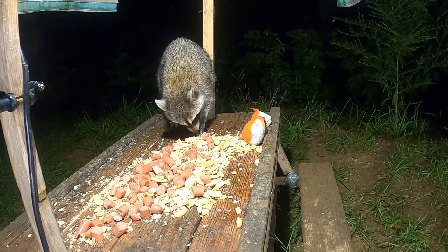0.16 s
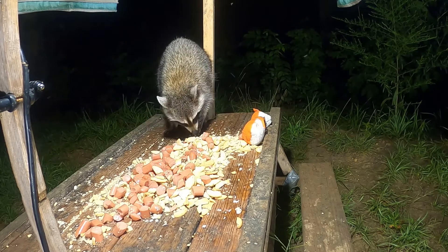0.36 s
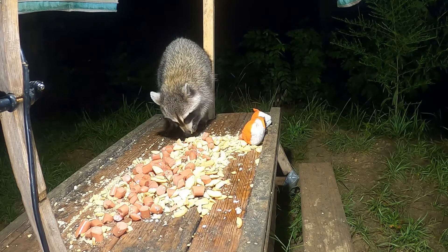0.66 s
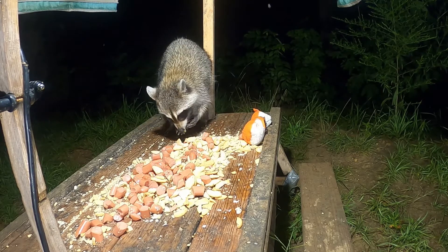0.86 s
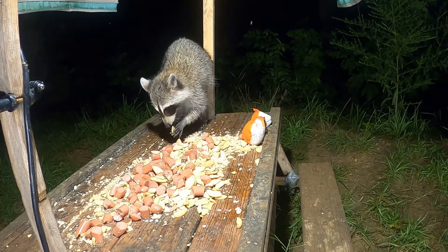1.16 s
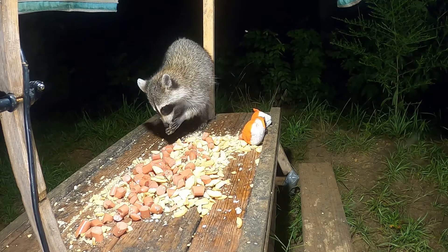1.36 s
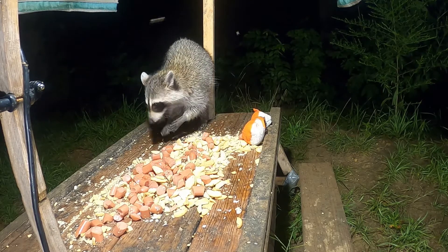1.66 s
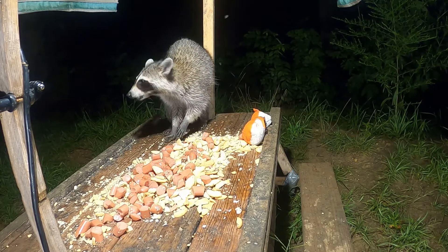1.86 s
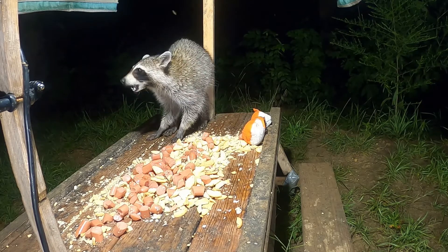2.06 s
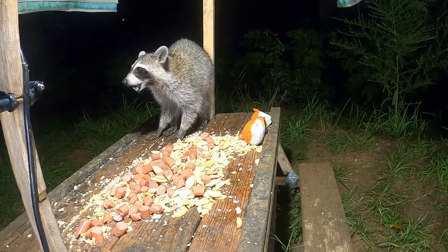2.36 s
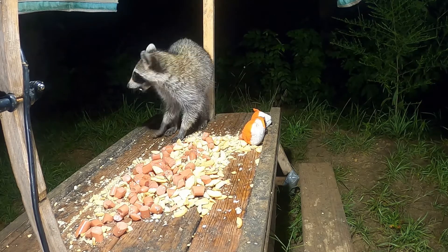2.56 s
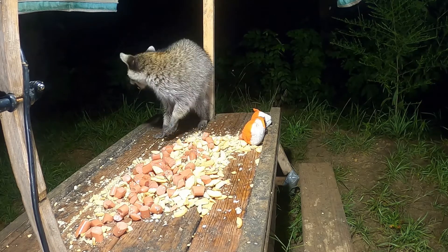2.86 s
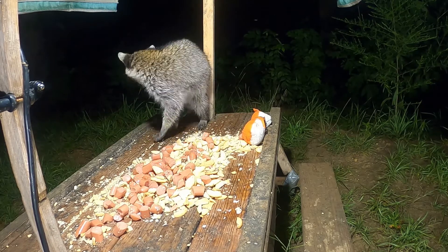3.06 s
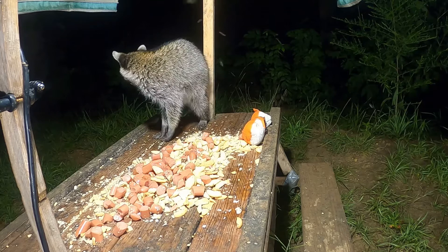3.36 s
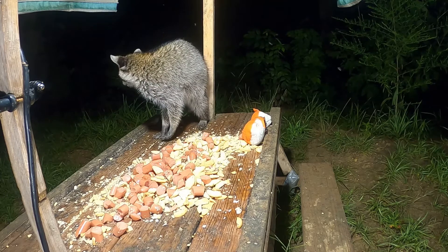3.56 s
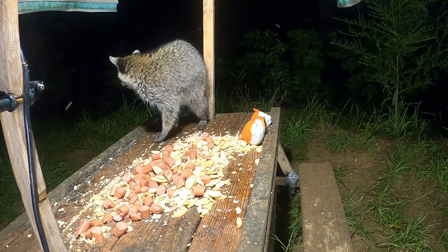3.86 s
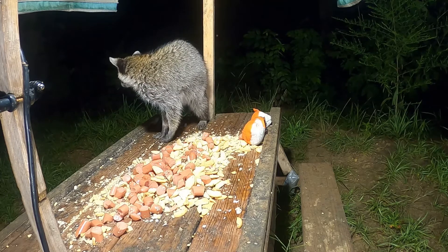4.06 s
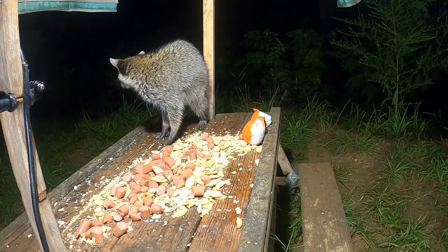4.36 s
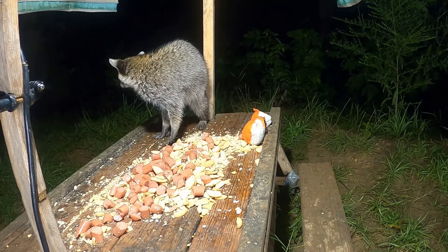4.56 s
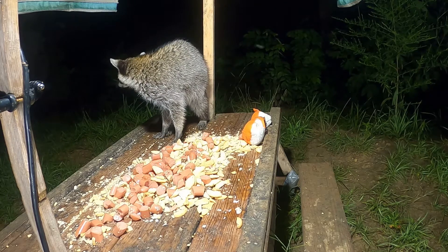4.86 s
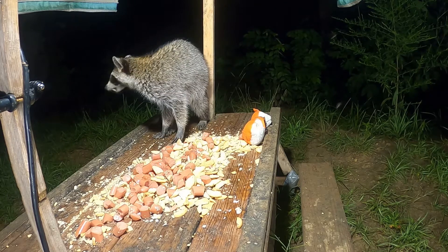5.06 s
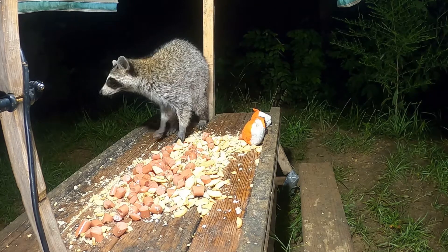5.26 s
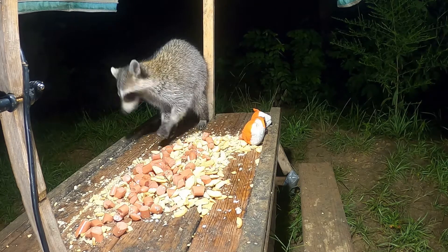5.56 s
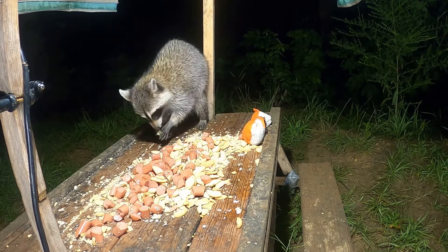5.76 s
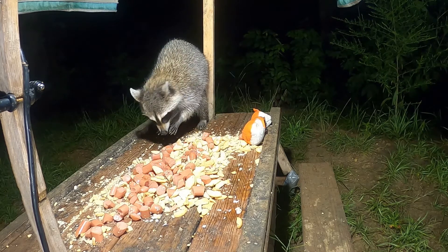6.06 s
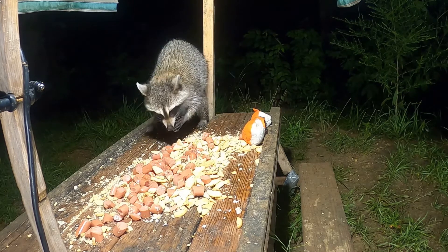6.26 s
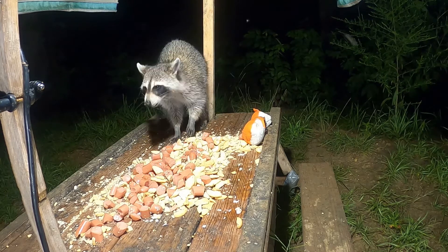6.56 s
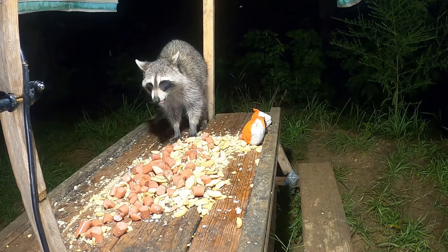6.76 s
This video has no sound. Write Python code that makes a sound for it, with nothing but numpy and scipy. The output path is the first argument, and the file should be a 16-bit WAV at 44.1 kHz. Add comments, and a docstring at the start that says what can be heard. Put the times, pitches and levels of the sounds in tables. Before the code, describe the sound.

A continuous wide insect chorus dominates: mid-high trilling, pulsing raspy chirrs and a thin treble sizzle, over very faint air and lumpy low rumble. A small animal feeding on a plank table adds sparse muffled taps, dull pips and scuffs around two to three seconds, then little until soft thumps and knocks gather in the last second and a half. Small stereo microphone near the table, open yard, no echo.

```python
"""A summer night in a wooded yard, heard from a wooden feeding table.
Throughout, low and treble air flicker, the table rumbles, choirs of gated sines trill as crickets,
and random file teeth ring wing modes as bush crickets, rasping in throbs. Soft pips sound from the start;
a high buzz begins its long phrases at 0.4 s, and a faint sizzle flares and thuds ring from 0.6 s.
From 2 s a small animal's scuffing contacts knock the planks into resonance."""
import sys
import numpy as np
from scipy import signal
from scipy.io import wavfile

SR = 44100
rng = np.random.default_rng(int(sys.argv[2]) if len(sys.argv) > 2 else 0)


def wav_out(sig):
    """Save sig, one row per channel (or a flat mono array), as 16-bit PCM at SR to the path in sys.argv[1]."""
    wavfile.write(sys.argv[1], SR, np.round(np.clip(np.atleast_2d(sig).T, -1, 1) * 32767).astype(np.int16))


def boost_factor(decibels):
    """Convert a level in decibels to a linear amplitude factor."""
    exponent = np.asarray(decibels, float) / 20
    return 10 ** exponent


N = 304731


def rms_one(x):
    """Normalization: scale to unit mean power."""
    return x / np.sqrt(np.mean(x ** 2) + 1e-20)


def at_hz(points, hz):
    """Interpolation of a spectrum on a logarithmic frequency axis."""
    return np.interp(np.log(hz), np.log(np.array(points)[:, 0]), np.array(points)[:, 1])


def drift(corner_hz, step=1):
    """Low-passed noise: two equal poles leave a slow chance of rms 1, read at every step-th sample."""
    r = np.exp(-80 * np.pi * corner_hz / SR)     # the noise is drawn once in 40 samples
    slow = signal.lfilter([1], [1, -2 * r, r * r], rng.standard_normal(N // 40 + 2002))[2000:]
    return np.interp(np.arange(0, N, step) / 40, np.arange(len(slow)), rms_one(slow))


def left_right(pan_db):
    """Interaural level difference: half is added at the left and half taken at the right, in dB."""
    return np.array([[pan_db / 2], [-pan_db / 2]])


def place(near, other, alike, lag_s, pan_db):
    """Interaural coherence: a shared part that arrives late on the left, and an unshared part."""
    alike = np.clip(alike, 0, 1)
    late = np.interp(np.arange(N) - lag_s * SR, np.arange(N), near)
    shared = np.sqrt(alike) * np.array([late, near])
    unshared = np.sqrt(1 - alike) * other
    return (shared + unshared) * boost_factor(left_right(pan_db))


def air(spectrum, low_hz, high_hz, patchy_db, lean):
    """Band-filtered noise: half-octave bands, each with its own flicker, coherence and side."""
    # likeness of the two ears: hz, correlation
    likeness = [(50, 0.96), (100, 0.34), (200, 0.26), (500, 0.07)]
    # level difference of the ears, scaled by lean: hz, left_over_right_db
    leaning = [(60, 0), (150, -2.5), (400, -7), (900, -6.5)]
    out = 0
    edges = low_hz * 2 ** np.arange(0, np.log2(high_hz / low_hz), 1 / 2)
    white = rng.standard_normal((2, 2, N + SR // 4))
    for k, (low, high) in enumerate(zip(edges, edges[1:])):
        band = signal.butter(2, [low, high], "band", fs=SR, output="sos")
        mid, side = signal.sosfilt(band, white[k % 2])[:, SR // 4:]     # without the filter's onset
        hz = np.sqrt(low * high)
        alike = np.clip(at_hz(likeness, hz), -1, 1)
        pan_db = lean * at_hz(leaning, hz)
        flicker = np.repeat(boost_factor(patchy_db * drift(6.4, step=8)), 8)[:N]
        gain = boost_factor(at_hz(spectrum, hz) + left_right(pan_db)) * flicker
        out = out + gain * (np.sqrt(1 + alike) * mid + np.sqrt(1 - alike) * side * [[1], [-1]])
    return rms_one(out)


def night_air():
    """Broadband noise: a low bed and a treble bed, each set to its own rms level."""
    # relative spectral density of the low air: hz, density_db_per_hz
    low_spectrum = [(74, -33), (125, -1.5), (161, -0.5), (216, -3), (328, -10.5), (603, -17), (786, -8.5),
                    (951, -19.5), (1100, -4), (1430, -31), (2420, -120)]
    # relative spectral density of the treble air: hz, density_db_per_hz
    treble_spectrum = [(1000, -29), (1600, 8), (6500, -10.5), (8200, -13), (9000, -16), (13000, -11),
                       (14300, -13), (15500, -30)]
    low = boost_factor(-67.5) * air(low_spectrum, 133.2, 1500, patchy_db=2.96, lean=0.8)
    treble = boost_factor(-60.5) * air(treble_spectrum, 1023, 17000, patchy_db=3.3, lean=0.28)
    return low + treble


def table_rumble():
    """Amplitude modulation of low-frequency noise: a lumpy rumble in the table."""
    # course of the rumble before its random waver: time_s, level_db
    level_rows = [(0.0, -71), (0.4, -76.5), (1.05, -70.5), (1.5, -79.5), (2.3, -68.5), (2.7, -76.5),
                  (3.8, -77), (4.7, -66.5), (5.4, -78), (6.91, -70)]
    # relative spectral density: hz, density_db_per_hz
    colour = [(18, -11), (30, 1.5), (45, -0.5), (90, -1.5), (112, -16), (140, -33)]
    s, db = np.transpose(level_rows)
    level_db = np.interp(np.arange(N) / SR, s, db) + 5.4 * drift(2.4)
    return boost_factor(level_db) * air(colour, 17.9, 150, patchy_db=1.9, lean=1)


def crickets():
    """Amplitude modulation: near sines cut into wing strokes that sag in pitch; singers swell and wander."""
    # choirs: lowest_hz, highest_hz, mean_strokes_per_s, level_db, left_over_right_db
    choir_rows = [(2126, 2280, 57, -48, 3.5), (2340, 2480, 65, -47.5, 6.5), (2890, 3090, 62, -50, 4)]
    singers, step = 21, 4     # per choir; tones are drawn at a quarter of the rate
    sag, gate_depth = 0.021, 0.92     # fraction of pitch lost over a stroke; depth of the cut
    swell_db, choir_waver_db = 3.0, 0.03     # rms swing of one singer and of a whole choir
    out = 0
    for low_hz, high_hz, strokes, level_db, pan_db in choir_rows:
        groups = np.zeros((3, len(range(0, N, step))))     # singers ahead, far left and far right
        for k, hz in enumerate(np.linspace(low_hz, high_hz, singers)):
            pace = strokes * rng.uniform(.93, 1.07) * (1 + .02 * drift(3.02, step=step))
            stroke = (rng.random() + np.cumsum(pace) * step / SR) % 1
            pitch_hz = hz * (1 + sag * (.5 - stroke) + .008 * drift(3.5, step=step))
            gate = 1 - gate_depth * np.cos(np.pi * stroke) ** 2
            tone = np.sin(2 * np.pi * (np.cumsum(pitch_hz) * step / SR + rng.random()))
            groups[k % 3] += boost_factor(swell_db * drift(12.6, step=step)) * gate * tone
        groups = rms_one(signal.resample_poly(groups, step, 1, axis=1)[:, :N])
        level = boost_factor(level_db + choir_waver_db * drift(2.5))
        out = out + level * place(groups[0], groups[1:], 0.68, 4e-5, pan_db)
    return out


def wings(modes, teeth_per_s, uneven_db):
    """Modal excitation: three crowds of random file teeth, each click ringing the wing modes."""
    born = rng.random((3, N)) < teeth_per_s / SR
    strength = boost_factor(uneven_db * np.minimum(rng.exponential(1, born.sum()), 4))
    clicks, out = np.zeros((3, N)), 0
    clicks[born] = strength * rng.choice([-1, 1], born.sum())
    for k, (hz, width_hz, level_db) in enumerate(modes):
        r = np.exp(-np.pi * width_hz / SR)
        stage = [(1 - r * r) / 2, 0, (r * r - 1) / 2, 1, -2 * r * np.cos(2 * np.pi * hz / SR), r * r]
        ringing = signal.sosfilt([stage, stage], clicks)     # applied twice for steep skirts
        out = out + (-1) ** k * boost_factor(level_db) * ringing
    return rms_one(out)


def bumps(times, levels_db, half_s, between_db):
    """Addition of incoherent powers: bell-shaped swells over a steady level; in dB."""
    t = np.arange(0, N, 64) / SR
    bell = np.exp(-((t - np.array(times)[:, None]) / half_s) ** 2 / 2)
    power = boost_factor(between_db) ** 2 + boost_factor(np.array(levels_db)) ** 2 @ bell
    return np.interp(np.arange(N) / SR, t, 10 * np.log10(power))


def crowd(modes, teeth_per_s, level_db, alike, lag_s, pan_db, flutter_db):
    """Stridulation: a crowd of rubbed wings at a fluttering level, spread between the ears."""
    voices = wings(modes, teeth_per_s, uneven_db=1.5)
    level = boost_factor(level_db + flutter_db * drift(22.0))
    return level * place(voices[0], voices[1:], alike, lag_s, pan_db)


def throbbing_raspers():
    """Pulsed stridulation: two sets of wing modes throb five or six times a second."""
    # rasped syllables, above the steady level: middle_s, upper_level_db, lower_level_db
    throb_rows = [(0.05, -45.5, -50.5), (0.24, -47.5, -58), (0.33, -45, -47), (0.56, -44.5, -49.5),
                  (0.98, -45, -51), (1.19, -42.5, -50), (1.3, -48, -53), (1.5, -48.5, -52),
                  (1.72, -45.5, -51.5), (1.89, -46.5, -55), (2.14, -48, -54), (2.32, -45.5, -50.5),
                  (2.46, -54, -55), (2.59, -45.5, -49.5), (2.77, -44, -47), (2.93, -48.5, -51),
                  (3.14, -51, -52.5), (3.32, -47.5, -51), (3.44, -49.5, -58), (3.63, -45.5, -52),
                  (3.85, -46, -53), (4.05, -46.5, -52), (4.24, -49, -49.5), (4.45, -51, -59),
                  (4.61, -47.5, -51.5), (4.73, -45.5, -49), (4.83, -46, -50), (4.95, -47, -51),
                  (5.23, -52, -72), (5.49, -56, -54.5), (5.6, -46.5, -53.5), (5.72, -47, -49),
                  (5.8, -47.5, -57), (5.91, -48.5, -51.5), (6.02, -49, -54), (6.2, -50.5, -53),
                  (6.38, -48, -51.5), (6.56, -49.5, -51), (6.78, -44.5, -50.5), (6.91, -48.5, -51)]
    # upper wing modes: hz, stage_width_hz, relative_level_db
    upper_modes = [(2673, 553, 2), (3250, 620, -8), (3910, 1030, -5.5), (4404, 640, -3), (4960, 720, -5.5)]
    # lower wing modes: hz, stage_width_hz, relative_level_db
    lower_modes = [(1290, 538, -11.5), (1436, 800, -15), (1887, 226, 3), (2085, 137, 2)]
    s, upper_db, lower_db = np.transpose(throb_rows)
    # half-widths in s; farther raspers fill the gaps between syllables
    upper_level_db = bumps(s, upper_db, half_s=0.045, between_db=-50.5)
    lower_level_db = bumps(s, lower_db, half_s=0.037, between_db=-56.5)
    upper = crowd(upper_modes, 5000, upper_level_db, .3, 3e-5, 3.0, .6)
    lower = crowd(lower_modes, 3000, lower_level_db, .72, 4e-5, 4.5, .6)
    return upper + lower


def far_raspers():
    """Superposition of many teeth: far singers blur into a steady band."""
    # wing modes: hz, stage_width_hz, relative_level_db
    modes = [(4730, 640, -0.5), (5650, 840, 2.5), (6025, 370, 3), (6208, 430, 2.5)]
    return crowd(modes, 9000, -51.5, .1, 3e-5, -.4, .5)


def phrases():
    """Piecewise-linear envelope: each phrase rises, holds and falls away to the pause level; in dB."""
    # phrases, length up to the fall: start_s, length_s, level_db
    phrase_rows = [(0.406, 1.24, -65.5), (2.52, 1.53, -65.5), (4.857, 1.5, -65)]
    rise_s, fall_s, pause_db = 0.15, 0.24, -79.0     # a far buzzer sounds in the pauses
    t, level_db = np.arange(N) / SR, np.full(N, pause_db)
    for s, length_s, db in phrase_rows:
        on = np.interp(t, s + np.array([0, rise_s, length_s, length_s + fall_s]), [0, 1, 1, 0])
        level_db = level_db + (db - pause_db) * on
    return level_db


def buzzer():
    """Modal resonance far up in the treble: a dense rasp in long phrases."""
    # main wing modes: hz, stage_width_hz, relative_level_db
    main_modes = [(8960, 2700, 1), (10390, 1700, 1.7)]
    # top wing mode: hz, stage_width_hz, relative_level_db
    top_mode = [(11900, 3100, 0)]
    level_db = phrases()
    main = crowd(main_modes, 9000, level_db, .05, 5e-5, -2.5, .8)
    top = crowd(top_mode, 9000, level_db - 7, .05, 5e-5, -5.0, 1.2)
    return main + top


def sizzler():
    """Modal resonance just under the buzzer: a faint singer flares up over a steady level."""
    # flares, above the steady level: middle_s, level_db
    flare_rows = [(0.56, -65.5), (1.46, -72), (2.8, -77), (3.6, -69), (5.56, -70), (6.13, -71), (6.69, -74)]
    # wing mode: hz, stage_width_hz, relative_level_db
    modes = [(7800, 1400, 0)]
    level_db = bumps(*np.transpose(flare_rows), half_s=0.078, between_db=-73)
    return crowd(modes, 6000, level_db, .05, 5e-5, -2.4, 1.2)


def blows(rows, rise_s, t60, overtone_db):
    """Damped oscillation: a soft blow swells, rings at its pitch and a weaker overtone, and dies."""
    out, t = np.zeros((2, N + SR)), np.arange(SR // 3) / SR
    for s, peak_db, hz, pan_db in rows:
        shape = (1 - np.exp(-t / rise_s)) ** 2 * boost_factor(-60 * t / t60)
        tone = np.sin(2 * np.pi * hz * t) + boost_factor(overtone_db) * np.sin(2 * np.pi * 1.48 * hz * t)
        at = round(s * SR)
        out[:, at:at + len(t)] += boost_factor(peak_db + left_right(pan_db)) * tone * shape / shape.max()
    return out[:, :N]


def thuds():
    """Low damped oscillation: weight shifts thump the table."""
    # thumps: start_s, envelope_peak_db, pitch_hz, left_over_right_db
    thud_rows = [(0.576, -61.5, 79.5, -4), (1.71, -59, 48.4, 0), (2.257, -69, 78.1, -3),
                 (4.685, -69, 95.5, 2), (4.925, -59, 101, 3), (5.598, -59, 43.4, 6), (5.81, -63, 78.1, -6),
                 (5.899, -59, 57, 2), (5.946, -56, 93, 6), (6.095, -58.5, 98, 0), (6.149, -58, 64.6, -1),
                 (6.242, -59, 79, 5), (6.299, -57, 40.4, 0), (6.624, -54.5, 94, 3), (6.7, -54, 53, 2)]
    return blows(thud_rows, rise_s=0.0086, t60=0.11, overtone_db=-13)


def pips():
    """Short damped oscillation: hollow pips with a faint overtone."""
    # pips: start_s, envelope_peak_db, pitch_hz, left_over_right_db
    pip_rows = [(0.0762, -63, 1640, 3), (0.852, -47.5, 1710, -3.0), (1.5738, -50, 1520, -2.0),
                (1.719, -46.5, 1466, -0.5), (1.9215, -54, 1460, 2.0), (5.9259, -58, 1450, 4.5),
                (6.0994, -54, 1450, -2.0), (6.3789, -52, 1395, 3.5)]
    return blows(pip_rows, rise_s=0.0039, t60=0.04, overtone_db=-23)


def knocks():
    """Forced plank resonance: a tap and a swell of grit ring the modes nearest the contact's pitch most."""
    # paws and food on the planks: start_s, peak_db, centre_hz, left_over_right_db
    knock_rows = [(2, -56, 799, -4), (2.028, -50.5, 670, -5), (2.273, -53.5, 1120, 2),
                  (2.298, -61, 415, -4.0), (2.407, -58.5, 859, -2.0), (2.761, -61.5, 603, -3.0),
                  (3.031, -59, 861, -3.5), (3.273, -63, 530, -7), (5.445, -56, 235, -5.0),
                  (5.649, -64, 915, -12), (5.714, -61, 1000, -0.5), (6.214, -52.5, 350, -2.5),
                  (6.681, -49, 829, -4), (6.699, -60, 640, -2.5)]
    # plank modes: hz, relative_level_db, t60_s
    plank_modes = [(190, -3, 0.026), (280, -8, 0.033), (412, 4, 0.015), (624, -2, 0.031), (811, 6, 0.029),
                   (975, 2.5, 0.036), (1133, 8, 0.032)]
    contact_s, spread_octaves = 0.016, 0.43     # grit peaks at a quarter of contact_s
    out, t = np.zeros((2, N + SR)), np.arange(SR // 4) / SR
    grits = rng.standard_normal((len(knock_rows), len(t)))
    for (s, peak_db, centre_hz, pan_db), grit in zip(knock_rows, grits):
        body = 0
        for hz, level_db, t60 in plank_modes:
            near_db = level_db - 5.8 * (np.log2(hz / centre_hz) / spread_octaves) ** 2
            swell = 1 - np.exp(-t * hz / 0.94)     # a padded paw: rings swell over a cycle or two
            body = body + boost_factor(near_db - 60 * t / t60) * swell * np.sin(2 * np.pi * hz * t)
        scuff = grit * t * np.exp(-4 * t / contact_s)
        scuff[0] = 0.63 * np.sqrt(np.sum(scuff ** 2))     # the first touch is one firm tap
        sound = signal.fftconvolve(scuff, body)[:len(t)]
        at = round(s * SR)
        out[:, at:at + len(t)] += boost_factor(peak_db + left_right(pan_db)) * sound / np.abs(sound).max()
    return out[:, :N]


def scene():
    """Superposition: the air below, insects all round, the table close."""
    background = night_air() + table_rumble()
    bush_crickets = throbbing_raspers() + far_raspers() + buzzer() + sizzler()
    table = thuds() + pips() + knocks()
    return background + crickets() + bush_crickets + table


def band_limit(x):
    """A steep low-pass at the top of the band."""
    return signal.sosfilt(signal.butter(12, 15620, fs=SR, output="sos"), x)


def record(dry):
    """Low-pass response: a small stereo microphone rolls off at the very top."""
    rolled = signal.sosfilt(signal.butter(4, 14500, fs=SR, output="sos"), dry)
    return band_limit(rolled)


dry = scene()
out = record(dry)
wav_out(out)
```